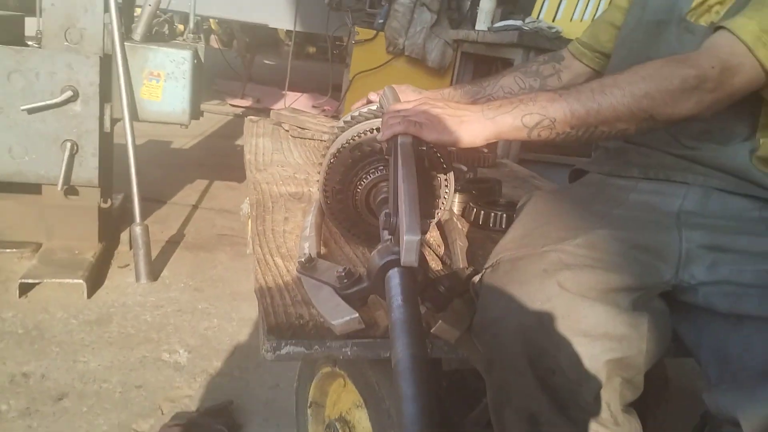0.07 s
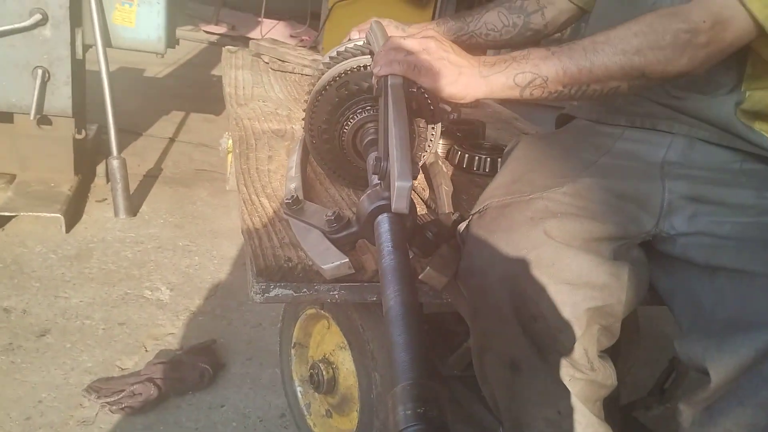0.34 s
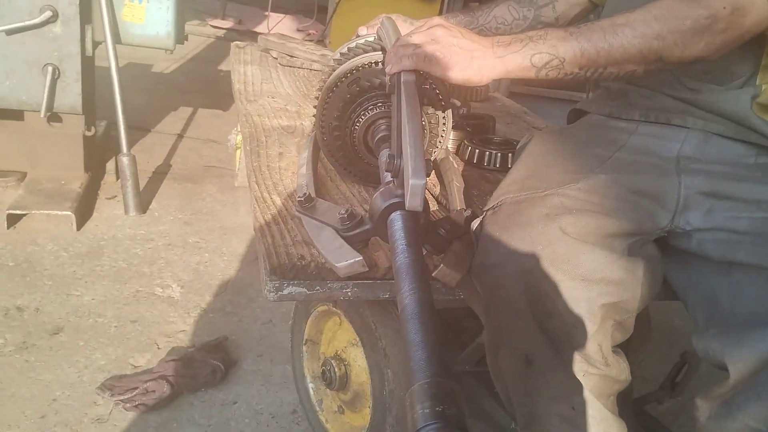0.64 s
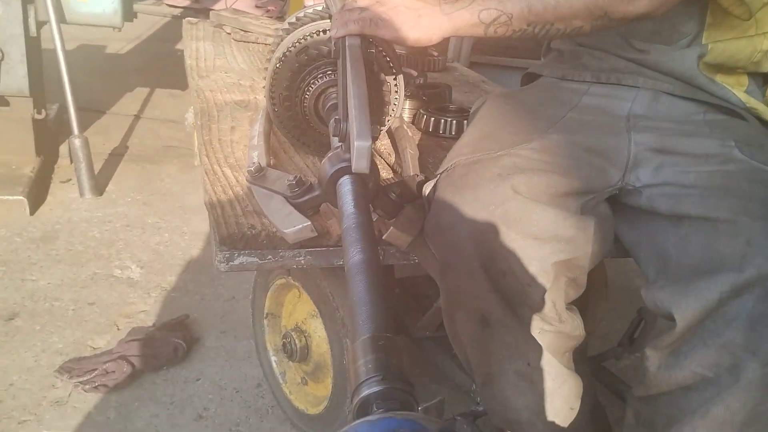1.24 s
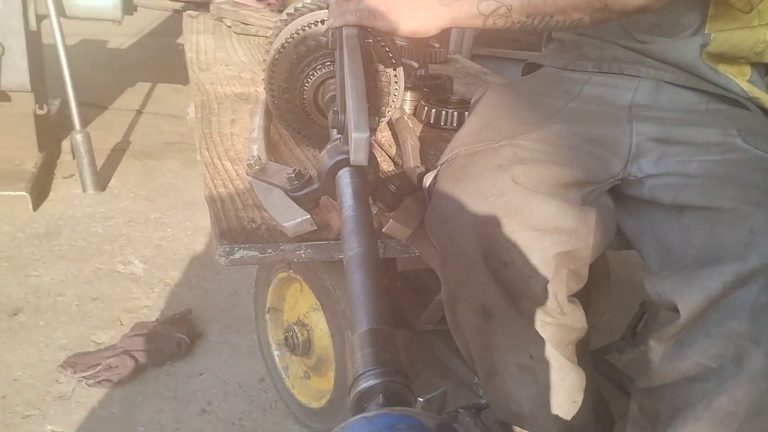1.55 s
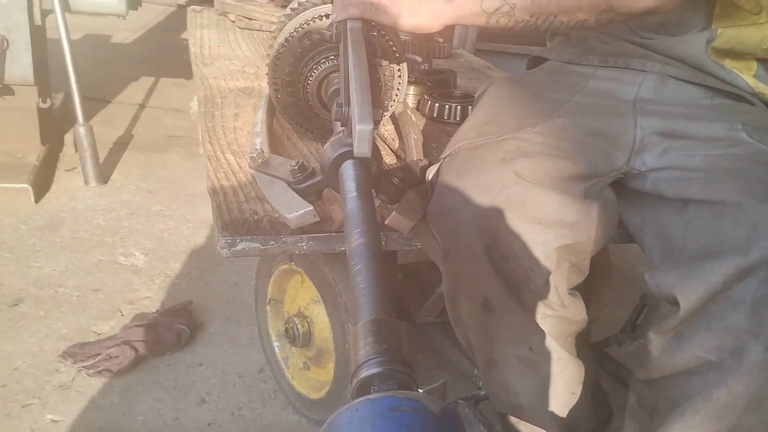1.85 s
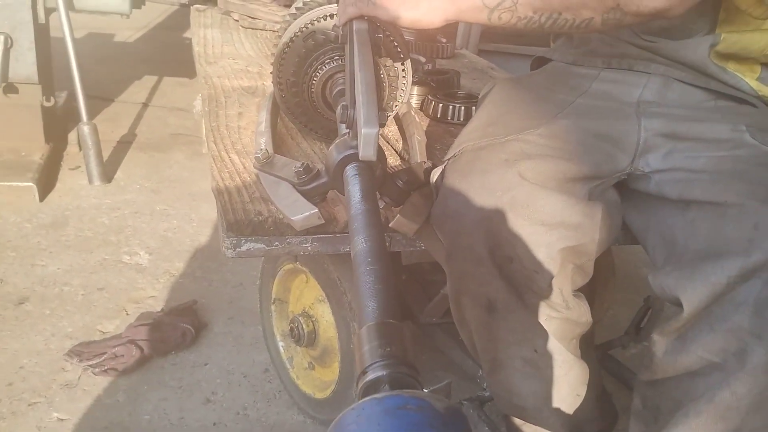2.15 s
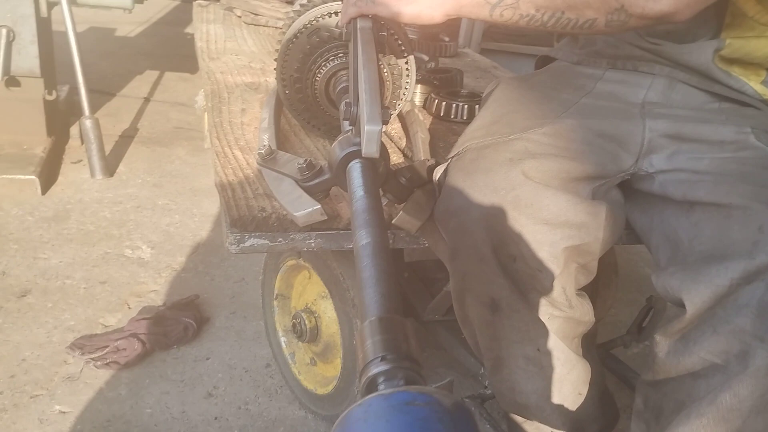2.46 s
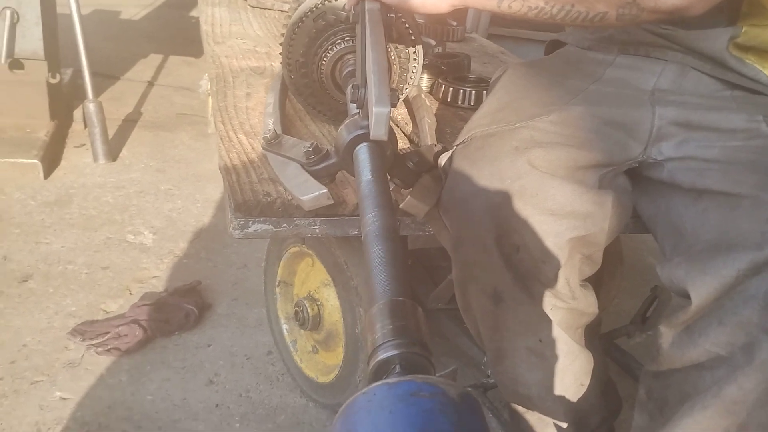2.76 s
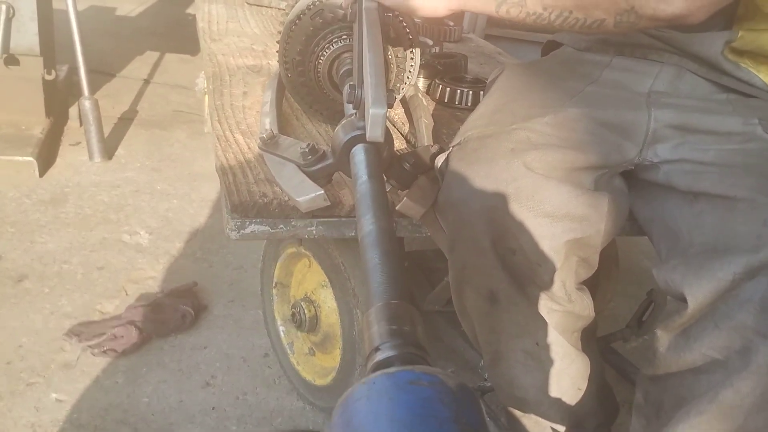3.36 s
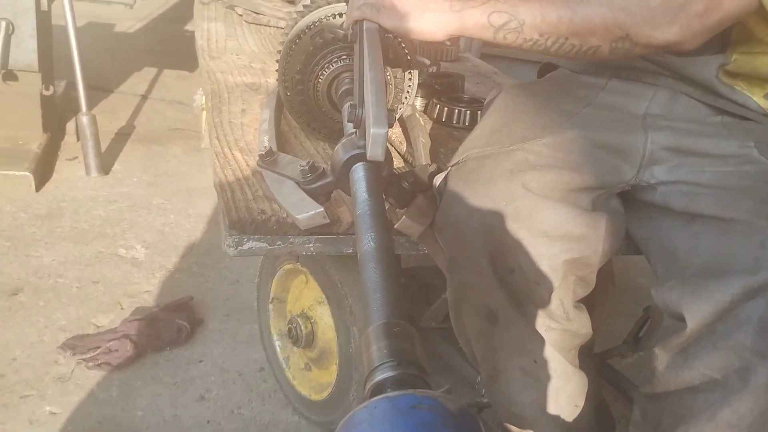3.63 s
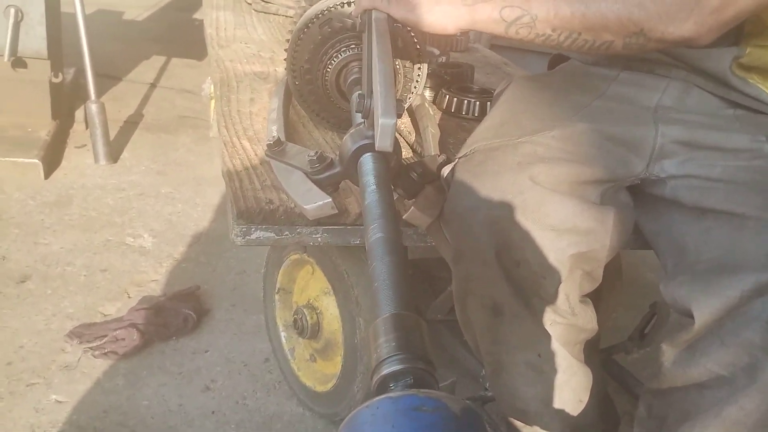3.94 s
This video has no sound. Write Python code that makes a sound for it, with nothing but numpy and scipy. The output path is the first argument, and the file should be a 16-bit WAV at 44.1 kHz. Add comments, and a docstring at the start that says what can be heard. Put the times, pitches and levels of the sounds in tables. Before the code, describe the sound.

Machinery hums briefly in an outdoor yard before a nearby electric hammer clanks onto a steel shaft and hammers rapidly without pause. The strikes ring and clatter, the motor rasps and drones, and the bit sometimes squeaks.

```python
"""An open work yard: machinery hums, then an electric hammer pounds a steel gear shaft 14 times a second.
Each cycle is a hard strike, a rebound of the bit and a two-part clatter as the piston draws back and thumps.
The impacts are brief broadband forces that excite the damped modes of bit, shaft and gear.
The bit seats with a clank and now and then squeaks. Motor and gears rasp under the blows,
the housing drones, and the hum of the yard sinks away."""
import sys
import numpy as np
from scipy import signal
from scipy.fft import rfft, irfft, next_fast_len
from scipy.io import wavfile

SR = 44100
rng = np.random.default_rng(int(sys.argv[2]) if len(sys.argv) > 2 else 0)


def wav_record(signal):
    """Record a signal, one row per channel, as 16-bit PCM in the file named by sys.argv[1]."""
    frames = np.transpose(np.atleast_2d(signal))
    bounded = np.clip(frames, -1, 1)
    # unit amplitude maps onto the largest positive 16-bit level
    quanta = np.round(bounded * 32767).astype(np.int16)
    wavfile.write(sys.argv[1], SR, quanta)


N = 176400
TIME = np.arange(N) / SR


def from_db(db):
    """Amplitude ratio: a factor of ten for every 20 dB."""
    return 10 ** (np.asarray(db) / 20)


def envelope(rows):
    """Exponential growth and decay: a gain that runs straight in dB between (seconds, dB) points."""
    return from_db(np.interp(TIME, *np.transpose(rows)))


def at_hz(points, hz):
    """Interpolation of (Hz, value) points on a logarithmic frequency axis."""
    point_hz, value = np.transpose(points)
    return np.interp(np.log(hz + 1), np.log(point_hz), value)


def drift(knots_per_s):
    """Slow random modulation: straight lines between Gaussian values."""
    knots = rng.standard_normal(400)
    return np.interp(TIME * knots_per_s, np.arange(len(knots)), knots)


def noise(grain_share=0, grains_per_s=3500):
    """Two independent streams of unit power: Gaussian hiss plus the shot noise of tiny steel touches."""
    chance = grains_per_s / SR
    touches = (rng.random(N) < chance) * rng.choice([-1, 1], (2, N)) / np.sqrt(chance)
    return np.sqrt(1 - grain_share) * rng.standard_normal((2, N)) + np.sqrt(grain_share) * touches


# The tool's stereo image. Each row: frequency in Hz, left-right correlation, left over right in dB.
TOOL_IMAGE = [(100, 0.97, -1), (500, 0.93, 0.5), (1200, 0.82, 0), (2000, 0.48, 0.5), (4000, 0.15, 2),
              (8000, -0.14, 1), (14000, -0.11, -3)]
MODE_COHERENCE = 0.91   # on a mode both microphones hear the same vibration

def radiate(pair, spectrum, modes=(), image=TOOL_IMAGE, size=16384):
    """Source and filter: two streams excite a resonant body, heard at two partly coherent microphones."""
    hz = np.arange(size // 2 + 1) * SR / size
    sides, image = np.array([[.5], [-.5]]), np.array(image)
    coherence = at_hz(image[:, :2], hz) + 0j
    db = at_hz(spectrum, hz) + sides * at_hz(image[:, ::2], hz)
    for mode_hz, width_hz, lift_db, *stereo in modes:
        resonance = 1 / (1 + (2 * (hz - mode_hz) / width_hz) ** 2)
        db += resonance * lift_db
        if stereo:
            pan_db, right_lead = stereo
            db += resonance * sides * pan_db
            coherence += resonance * (MODE_COHERENCE * np.exp(1j * right_lead) - coherence)
    # Folding the cepstrum gives a causal, minimum-phase response.
    cepstrum = irfft(np.log(from_db(db)))
    cepstrum[:, 1:size // 2] *= 2
    cepstrum[:, size // 2 + 1:] = 0
    response = irfft(np.exp(rfft(cepstrum)))
    padded = 2 * next_fast_len((N + size) // 2)
    left, independent = rfft(pair, padded)
    coherence = np.interp(np.arange(len(left)) * SR / padded, hz, coherence)
    right = coherence * left + np.sqrt(np.maximum(1 - abs(coherence) ** 2, 0)) * independent
    return irfft(np.array([left, right]) * rfft(response, padded))[:, :N]


# Machinery rumble. Each row: frequency in Hz, level in dB.
RUMBLE_SPECTRUM = [(30, -37), (46, -24), (80, -25.5), (370, -25), (450, -31), (620, -37), (1000, -34),
                   (1200, -42.5), (1450, -40), (2000, -44), (5500, -47.5), (8300, -55), (12300, -72)]
# Thin whistles of air. Each row: frequency in Hz, bandwidth in Hz, lift in dB.
AIR_WHISTLES = [(1450, 150, 3.5), (4900, 150, 5.5), (8200, 200, 5), (9300, 250, 3.5)]
# The diffuse field. Each row: frequency in Hz, left-right correlation, left over right in dB.
YARD_IMAGE = [(120, 0.95, -0.5), (348, 0.85, -0.5), (700, -0.053, 2.3), (2500, 0.093, 1), (5000, -.08, 4.5),
              (14000, 0.14, 0)]
# Machinery hum. Each row: frequency in Hz, level in dB.
HUM_LINES = [(60.5, -57), (121, -53), (150, -55), (168, -54.5), (180, -53.5), (322.5, -61), (377, -53.5),
             (2476, -71), (4947, -72)]
# The fade of rumble and hum together. Each row: time in seconds, gain in dB.
YARD_LEVEL = [(0, 0.5), (.83, -0.5), (.87, -4), (1.55, -25.5)]

def yard(wander_hz=.6, waver_db=1.5):
    """Machinery radiates a wavering line spectrum over a continuous rumble."""
    hum = 0
    for hz, db in HUM_LINES:
        phase = 2 * np.pi * (rng.random() + np.cumsum(hz + wander_hz * drift(8.4)) / SR)
        hum += np.sqrt(2) * from_db(db + waver_db * drift(13.9)) * np.sin(phase)
    rumble = radiate(noise(), RUMBLE_SPECTRUM, AIR_WHISTLES, YARD_IMAGE)
    return (rumble + hum) * envelope(YARD_LEVEL)


# Brief low tones. Each row: centre in seconds, half-width in seconds, frequency in Hz, top rms level in dB.
SWELLS = [(.155, 0.028, 486, -46.5), (1.07, 0.055, 180, -42.5)]

def swells():
    """Gaussian tone pulses, one in the yard and one as the tool comes up to speed."""
    out = 0
    for centre, width, hz, db in SWELLS:
        bell = np.exp(-((TIME - centre) / width) ** 2)
        out += np.sqrt(2) * from_db(db) * bell * np.sin(2 * np.pi * hz * TIME)
    return out


# Gear rasp and housing drone. Each row: frequency in Hz, level in dB.
RASP_SPECTRUM = [(250, -61.5), (540, -42), (640, -31), (1800, -32.5), (2400, -25), (4300, -25),
                 (4800, -27.5), (6900, -29), (8700, -26), (10300, -34), (16000, -41)]
HOUSING_SPECTRUM = [(45, -63), (110, -30.5), (160, -25.5), (240, -29), (295, -23.5), (345, -25),
                    (450, -33.5), (1500, -67)]
# Gear case resonances. Each row: frequency in Hz, bandwidth in Hz, lift in dB.
GEAR_CASE_MODES = [(2290, 400, 2), (4330, 260, 6), (6150, 110, 5), (8400, 140, 3.5)]
# The envelopes of motor and housing. Each row: time in seconds, gain in dB.
MOTOR_LEVEL = [(.828, -38), (.838, -5.5), (.97, -6), (1.04, -1.13)]
HOUSING_LEVEL = [(.83, -37), (.9, -4.5), (1.1, 2), (2, 1.5), (4, -5.5)]

def motor(tone_hz=317.4, wander_hz=11.97, tone_db=-54):
    """Forced vibration: the gears rasp in their case and the housing drones under the rotation tone."""
    running = envelope(MOTOR_LEVEL)
    phase = 2 * np.pi * np.cumsum(tone_hz + wander_hz * drift(20)) / SR
    tone = np.sqrt(2) * from_db(tone_db) * np.sin(phase) * running
    rasp = radiate(noise(grain_share=0.31) * running, RASP_SPECTRUM, GEAR_CASE_MODES)
    drone = radiate(noise() * envelope(HOUSING_LEVEL), HOUSING_SPECTRUM)
    return rasp + tone + drone


def contacts(times, levels_db, shape, jitter_s=0, spread_db=0):
    """Incoherent addition: impacts sum in power, each rising, holding and decaying exponentially."""
    delay, attack, hold, decay = shape
    power = np.zeros(N)
    for onset, db, (late, strong) in zip(times, levels_db, rng.standard_normal((len(times), 2))):
        start = int((onset + delay + jitter_s * late) * SR)
        span = power[start:start + SR // 10]
        t = TIME[:len(span)]
        pulse = np.minimum(t / attack, 1) * np.exp(-np.maximum(t - attack - hold, 0) / decay)
        span += (from_db(db + spread_db * strong) * pulse) ** 2
    return power


# Hammer cycles. Each row: start in seconds, then gains in dB of crack, low clank, rebound and clatter.
CYCLES = [(0.836, -28, -2, -22, -2.5), (0.908, -6, -1, -7, -3), (0.979, -7.5, -6, 3, 0),
          (1.0522, -1.5, 0, -0.5, 1), (1.1204, -0.5, 1, 2, 1.5), (1.1916, -3.5, 3, 2, 0),
          (1.2611, -1, 3.5, 0.3, 1), (1.33, 2, 0.5, -6, -0.5), (1.4023, 0.5, 1.5, 0, 2),
          (1.473, -1.5, -1.5, 0, 0.2), (1.5431, -0.5, -1.5, 0, 1.5), (1.6132, -1, 2, -2.5, 0),
          (1.6829, -0.5, 2.7, -7, -1), (1.7533, -1, 2, -5, 0), (1.8231, -1.5, 5.5, 0, -0.5),
          (1.8948, -0.5, 2.5, 0.5, 1.5), (1.966, -2, 1.5, 0, 2), (2.0359, -2, 2.5, 0.5, 0),
          (2.1075, -1, 2.5, 0.5, 1), (2.1785, -1.5, 2.5, 2, 0.5), (2.2497, -2, -7, -0.5, -1.2),
          (2.322, -1, -2.6, -1.5, 0), (2.3943, -2, -1.5, -1, -1), (2.4651, -2, 5, 1, -0.5),
          (2.5366, -1, 0, 0.5, 0), (2.6062, -2.5, 5, 0, 1.5), (2.6772, 0.7, 3.5, -2, -1),
          (2.749, -0.5, 5.5, -2, 1.5), (2.8215, -1, 4.5, -5, -1), (2.8906, 0.3, 3.5, -4, 0.5),
          (2.9596, -0.3, 3, -0.5, -1.5), (3.0287, 0, 0.5, -3.5, -1), (3.103, 0, 4.5, 0, 1),
          (3.173, -2, 4.5, 1.5, 0.5), (3.243, -1, 2.5, 2.5, 1), (3.3115, -3, 5, 1.5, 2.5),
          (3.3822, 0.2, 5, 1.5, 2.5), (3.4557, -0.5, 3.5, 2, 1.5), (3.5271, -3.5, 3.5, 3, 1.7),
          (3.5987, -3, 4, 1, 0.5), (3.668, -2, 2.5, 0, -0.5), (3.738, -1, 4.5, -2, 0),
          (3.8086, -2, 0.8, 0, 0.5), (3.8784, -2, 4, 0.5, 1), (3.948, 0, 0, 0, -0.2)]
CYCLE_STARTS, STRIKE_DB = np.transpose(CYCLES)[:2]
# Spectra of the contacts. Each row: frequency in Hz, level in dB.
CRACK_SPECTRUM = [(650, -67), (1800, -30), (2600, -18), (3600, -21.5), (4900, -14), (6000, -18),
                  (8200, -12.5), (10300, -22), (13000, -26)]
CLANK_SPECTRUM = [(150, -62), (510, -36.5), (620, -24), (1800, -22.5), (4000, -25), (10000, -54)]
REBOUND_SPECTRUM = [(250, -60), (600, -32), (900, -28), (1900, -28.5), (4900, -22.5), (6000, -24.5),
                    (8200, -20), (10300, -29.5), (16000, -49)]
CLATTER_SPECTRUM = [(250, -60.5), (520, -38), (680, -29), (1000, -26.5), (1900, -26), (4900, -22),
                    (6000, -24), (8400, -19), (9400, -22), (10400, -30.5), (16000, -37)]
# Modes of bit, shaft and gear. Each row: frequency in Hz, bandwidth in Hz, lift in dB,
# left over right in dB, phase lead of the right in radians.
STEEL_MODES = [(1058, 122, 7, -0.5, -2), (1500, 147, 5, -7, 0), (2268, 125, 6, 2.5, 0.5),
               (2423, 65, 3, 7, 0.6), (3260, 87, 4.5, 6, -1.5), (3994, 45, 4, 14, -1.5),
               (4285, 110, 3.5, 0, 1.5), (4900, 100, 4.5, 0.5, -2.5), (6450, 130, 1.5, 3, -0.5),
               (7230, 170, 2.5, 0, 0), (7930, 145, 3.5, -3, -0.5)]
SHAFT_MODE = (5366, 170, 7, 0, 1)   # the shaft's strongest
ALL_MODES = STEEL_MODES + [SHAFT_MODE]
# Contacts within a cycle. Each row: delay, attack, hold and decay time constant, all in seconds.
STRIKE = (0, .0003, .0045, .0055)
REBOUND = (.008, .0027, .0079, .006)
TICK = (.033, .0003, 0, .0015)
RELEASE = (.0359, .001, .0032, .0056)
RETURN = (.0449, .0016, .0025, .0079)
GRAIN_SHARE = 0.42   # part of a contact's power in separate touches

def hammer():
    """Impact excitation: strike, rebound and return clatter all drive the same modes of the steel."""
    clank_db, rebound_db, clatter_db = np.transpose(CYCLES)[2:]
    scatter = dict(jitter_s=0.00063, spread_db=1.33)
    clatter = contacts(CYCLE_STARTS, clatter_db, RELEASE, **scatter)
    clatter += contacts(CYCLE_STARTS, clatter_db, RETURN, **scatter)
    clatter += contacts(CYCLE_STARTS, clatter_db - 2.5, TICK, jitter_s=0.00204, spread_db=3.5)
    layers = [(contacts(CYCLE_STARTS, STRIKE_DB, STRIKE), CRACK_SPECTRUM),
              (contacts(CYCLE_STARTS, clank_db, STRIKE), CLANK_SPECTRUM),
              (contacts(CYCLE_STARTS, rebound_db, REBOUND, **scatter), REBOUND_SPECTRUM),
              (clatter, CLATTER_SPECTRUM)]
    return sum(radiate(np.sqrt(power) * noise(GRAIN_SHARE), spectrum, ALL_MODES)
               for power, spectrum in layers)


# The seating clank. Each row: frequency in Hz, level in dB.
SEATING_SPECTRUM = [(400, -48), (1100, -31.5), (4500, -23), (5600, -40)]
# Its resonances. Each row: frequency in Hz, bandwidth in Hz, lift in dB.
SEATING_MODES = [(2650, 110, 10), (3860, 96, 10)]
SEATING = (.00089, .001, .03, .006)   # delay, attack, hold and decay in seconds

def seating_clank():
    """One long contact excites two resonances as the bit seats on the gear."""
    power = contacts(CYCLE_STARTS[:1], [0], SEATING)
    return radiate(np.sqrt(power) * noise(GRAIN_SHARE), SEATING_SPECTRUM, SEATING_MODES)


def damped_sines(times, pitches_hz, levels_db, decay_s, attack_s=0):
    """Damped oscillators: sines of random phase that may swell in, then decay exponentially."""
    out, t = np.zeros(N + SR), TIME[:SR // 10]
    shape = np.exp(-t / decay_s) * np.minimum((t + 1 / SR) / (attack_s + 1 / SR), 1) ** 2
    shape /= shape.max()
    for onset, hz, db, turn in zip(times, pitches_hz, levels_db, rng.random(len(times))):
        start = int(onset * SR)
        out[start:start + len(t)] += from_db(db) * shape * np.sin(2 * np.pi * (turn + hz * t))
    return out[:N]


# The free ring of the shaft's strongest mode. Each row: time in seconds, gain in dB.
SHAFT_LEVEL = [(2.2, 4), (2.6, 5), (3.1, -8)]

def steel_ring(base_db=-46, spread_db=8.5, detune=.008, width_share=0.65):
    """Free vibration: each strike rings every mode with its own strength and tuning as the bit shifts."""
    out = np.zeros((2, N))
    for mode in ALL_MODES:
        hz, width_hz, lift_db, pan_db, _ = mode
        strong, sharp = np.clip(rng.standard_normal((len(CYCLES), 2)), -2, 1.5).T
        db = base_db + STRIKE_DB + lift_db + spread_db * strong
        decay_s = 1 / (np.pi * width_hz * width_share)   # a narrower mode rings longer
        gain = envelope(SHAFT_LEVEL) if mode is SHAFT_MODE else 1
        for channel, side in enumerate((.5, -.5)):
            onsets = CYCLE_STARTS + STRIKE[2] * rng.random(len(CYCLES))
            out[channel] += gain * damped_sines(onsets, hz * (1 + detune * sharp), db + side * pan_db, decay_s)
    return out


def loose_parts(per_strike=5, low_hz=620, high_hz=5585, base_db=-39.5):
    """Shock excitation: each strike rings a different few gear teeth and loose parts."""
    count = per_strike * len(CYCLES)
    hz = rng.uniform(low_hz, high_hz, count)
    onsets = np.repeat(CYCLE_STARTS, per_strike) + REBOUND[0] * rng.random(count)
    db = base_db + np.repeat(STRIKE_DB, per_strike) + 2 * rng.standard_normal(count)
    return damped_sines(onsets, hz, db, decay_s=0.0097)


# The piston's thumps. Each row: time in seconds, peak level in dB.
THUMP_LEVEL = [(.84, -47), (1.05, -38.5), (1.28, -44), (1.38, -40), (2.2, -47.5), (4, -50.5)]

def piston(delay_s=0.0168, length_s=0.0623, start_hz=72.8, end_hz=200):
    """An exponential chirp: one low thump rises in pitch each time the piston draws back."""
    strokes = np.zeros(N + SR)
    strokes[((CYCLE_STARTS + delay_s) * SR).astype(int)] = 1
    progress = np.linspace(0, 1, int(length_s * SR))
    hz = start_hz * (end_hz / start_hz) ** progress
    thump = np.interp(progress, [0, 0.37, 1], [0, 1, 0]) * np.sin(2 * np.pi * np.cumsum(hz) / SR)
    return signal.fftconvolve(strokes, thump)[:N] * envelope(THUMP_LEVEL)


# Loud squeaks of the bit. Each row: start in seconds, frequency in Hz, level in dB.
LOUD_SQUEAKS = [(1.024, 9020, -26), (1.304, 8330, -30), (3.353, 8300, -27), (3.426, 8200, -24),
                (3.499, 8280, -24)]

def squeaks(delay_s=.044, centre_hz=8400, spread_hz=340, faint_db=-37, spread_db=8.5):
    """Friction tones: the bit squeaks on the steel late in the return, mostly faintly, at times loudly."""
    onsets = CYCLE_STARTS[2:] + delay_s
    sharp, strong = rng.uniform(-0.89, 1, (len(onsets), 2)).T
    faint = np.transpose([onsets, centre_hz + spread_hz * sharp, faint_db + spread_db * strong])
    times, hz, db = np.vstack([LOUD_SQUEAKS, faint]).T
    roughness = 1 + 0.84 * signal.resample(rng.standard_normal((2, N // 100)), N, axis=1)
    tones = [damped_sines(times, hz, db, decay_s=0.0058, attack_s=0.011) for _ in range(2)]
    return roughness * np.array(tones)


def scene():
    """Superposition: the hammer close by, the yard behind it."""
    background = yard() + swells()
    tool = motor() + hammer() + seating_clank() + steel_ring() + loose_parts() + piston() + squeaks()
    return background + tool


def record(dry):
    """Band limiting and soft saturation: deep bass is cut, peaks are rounded, the top is cut steeply."""
    highpass = signal.butter(4, 38, "high", fs=SR, output="sos")
    lowpass = signal.ellip(12, .1, 80, 15900, fs=SR, output="sos")
    ceiling = from_db(-9)
    rounded = ceiling * np.tanh(signal.sosfilt(highpass, dry) / ceiling)
    return signal.sosfilt(lowpass, rounded)


dry = scene()
out = record(dry)
wav_record(out)
```